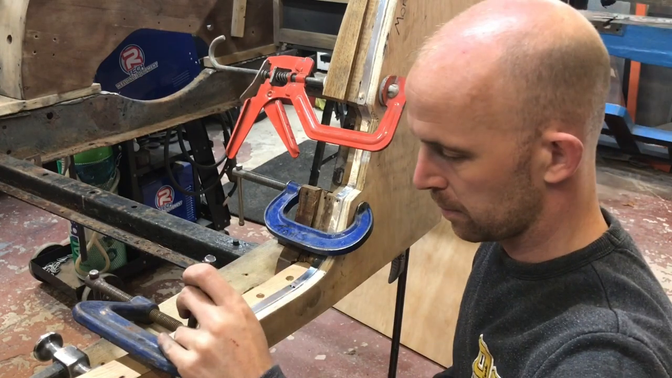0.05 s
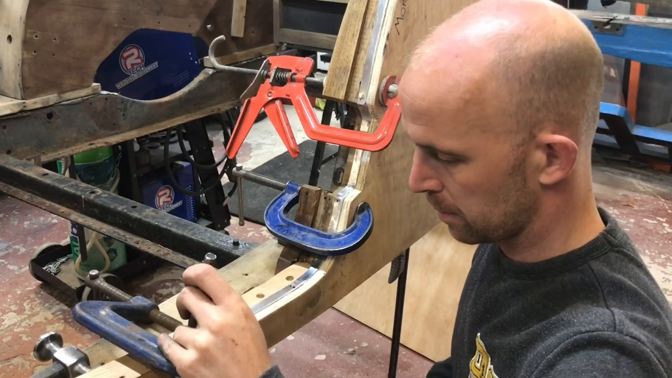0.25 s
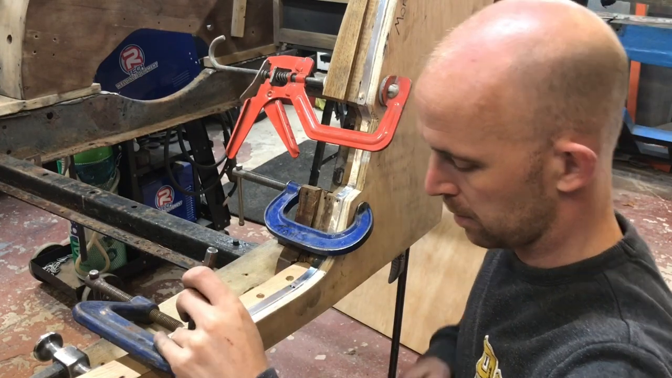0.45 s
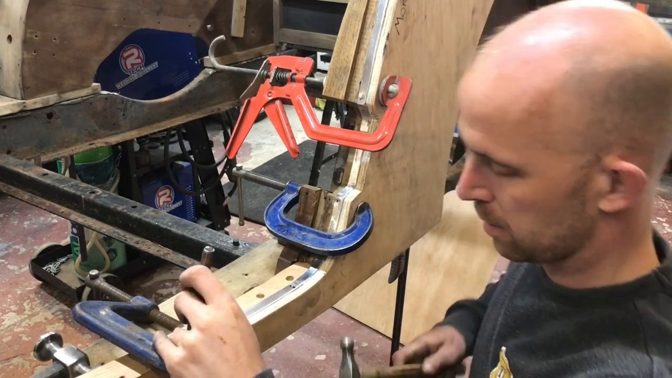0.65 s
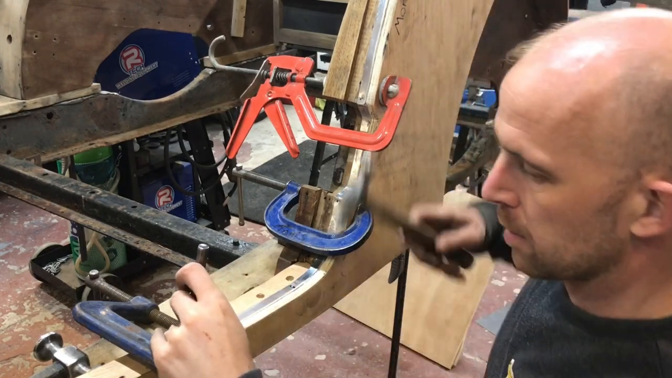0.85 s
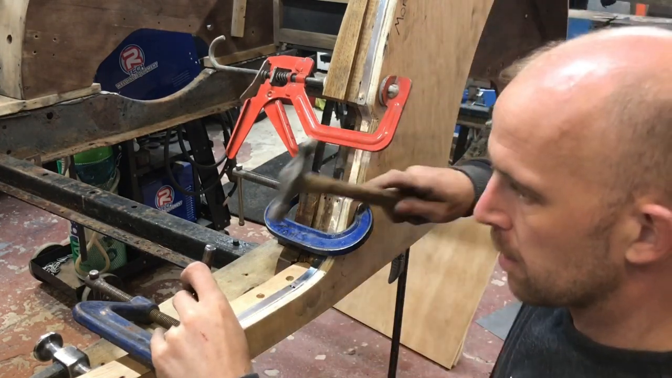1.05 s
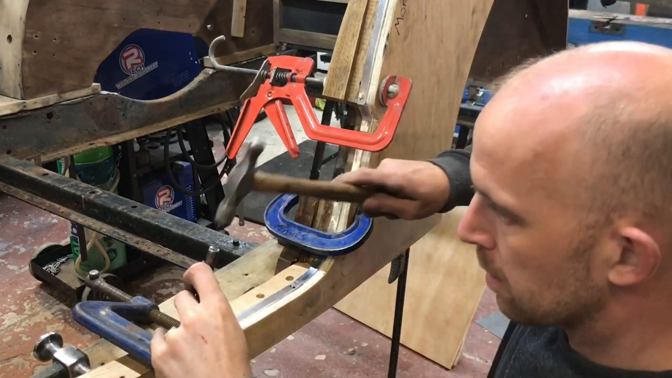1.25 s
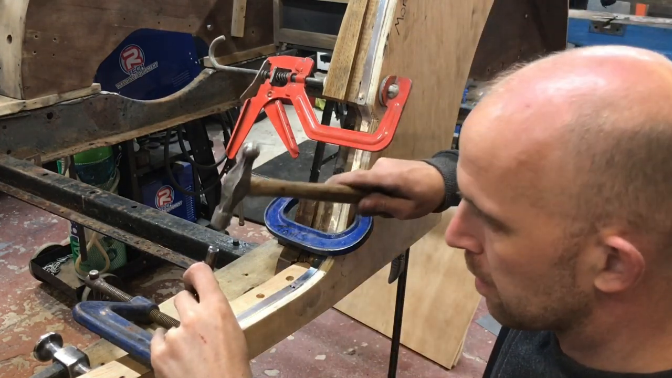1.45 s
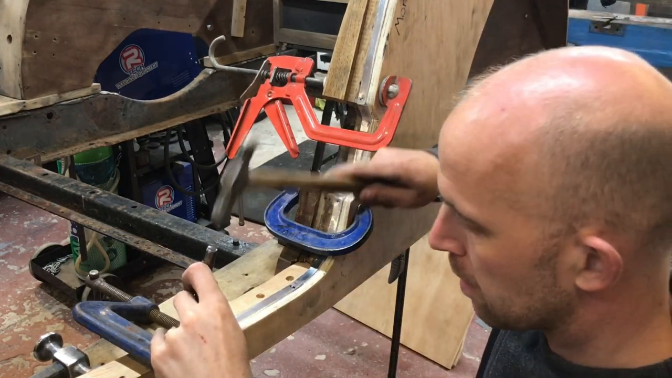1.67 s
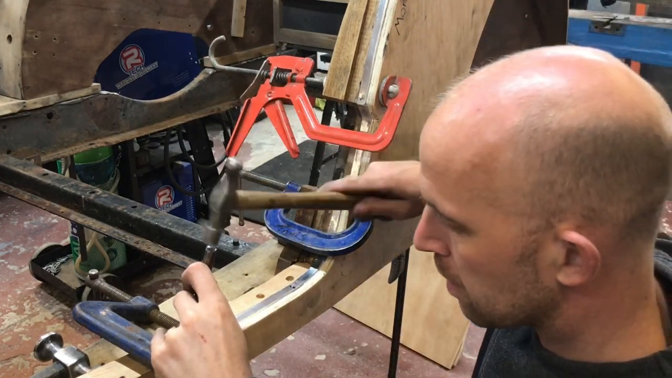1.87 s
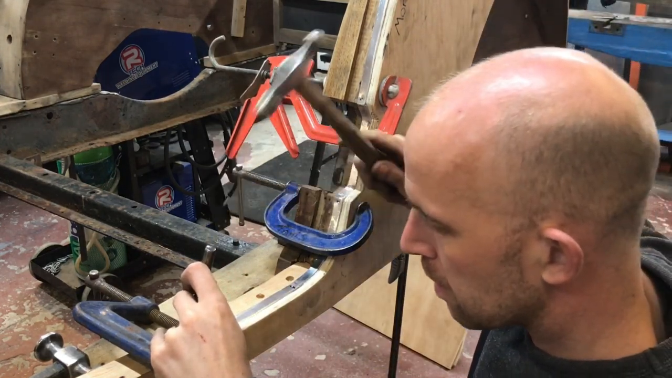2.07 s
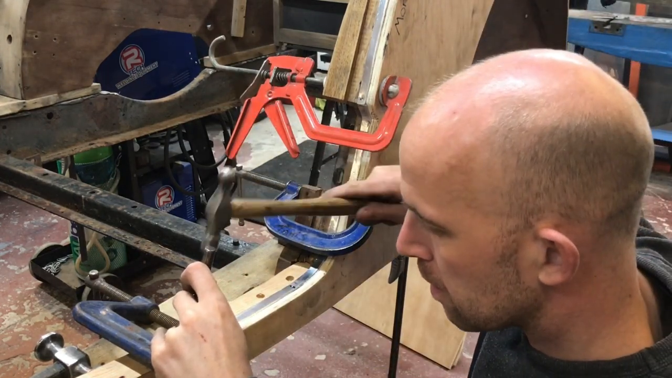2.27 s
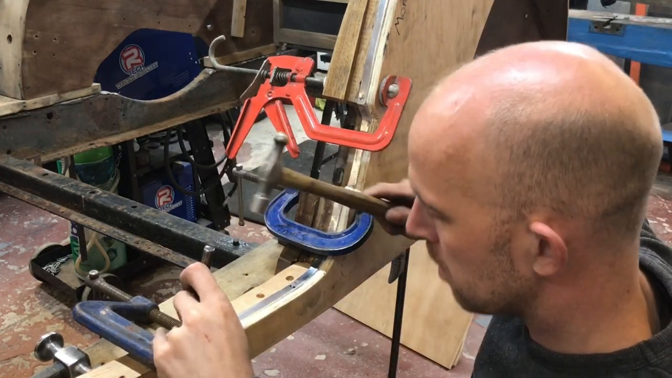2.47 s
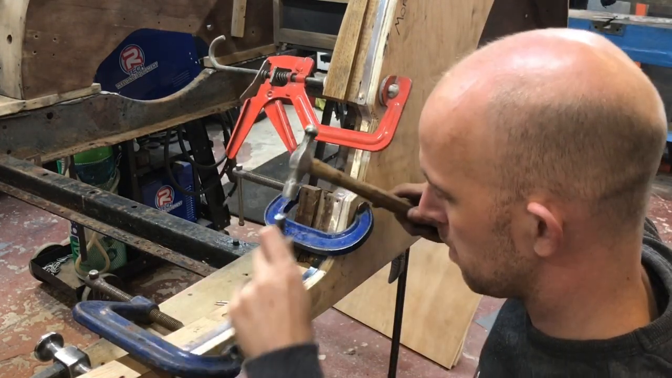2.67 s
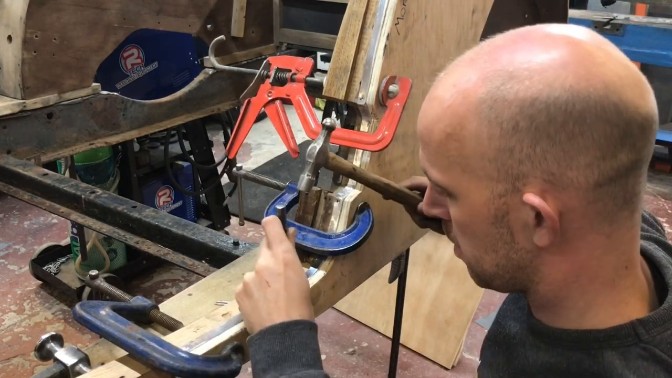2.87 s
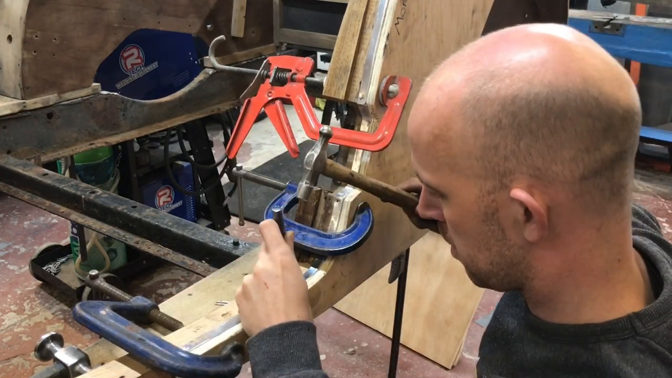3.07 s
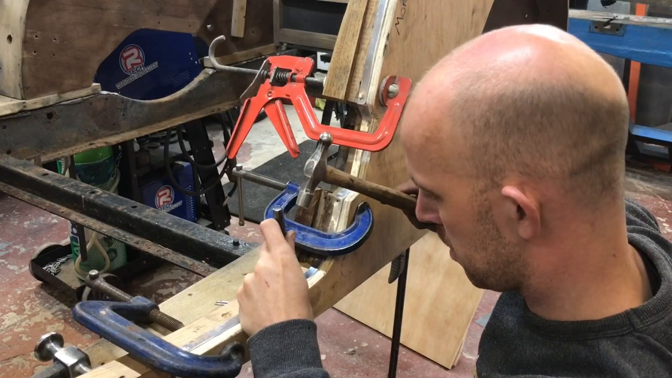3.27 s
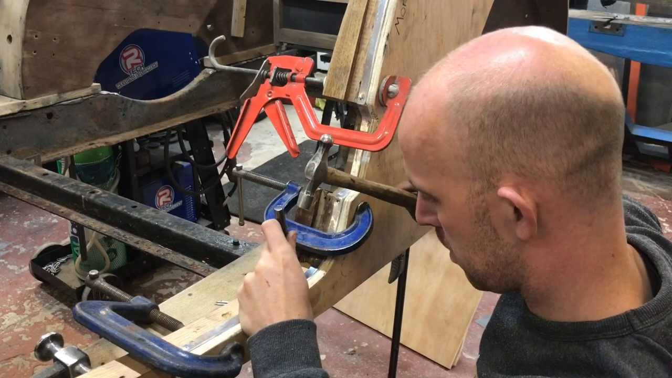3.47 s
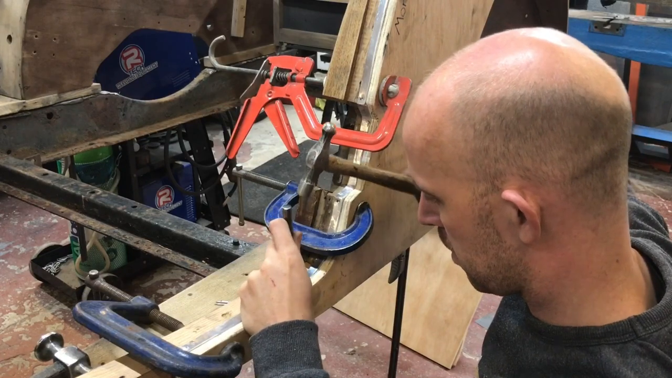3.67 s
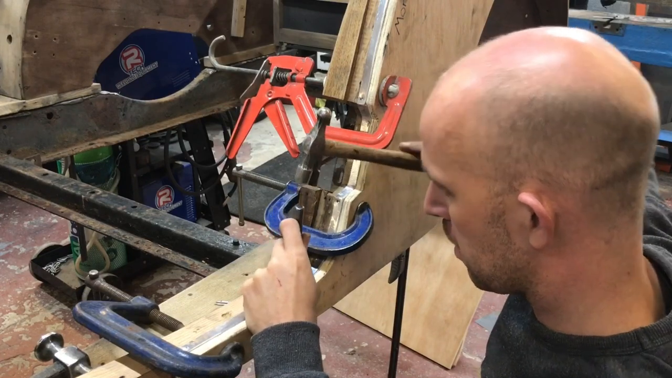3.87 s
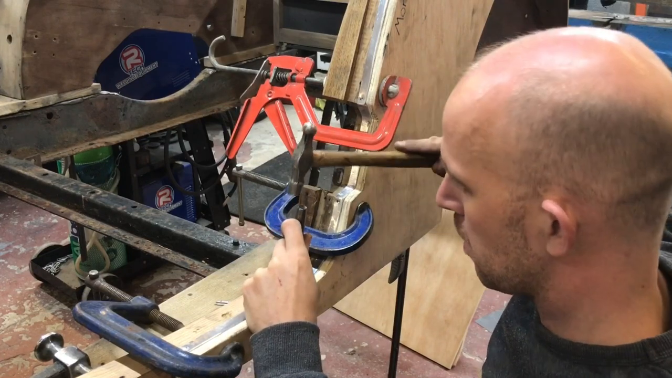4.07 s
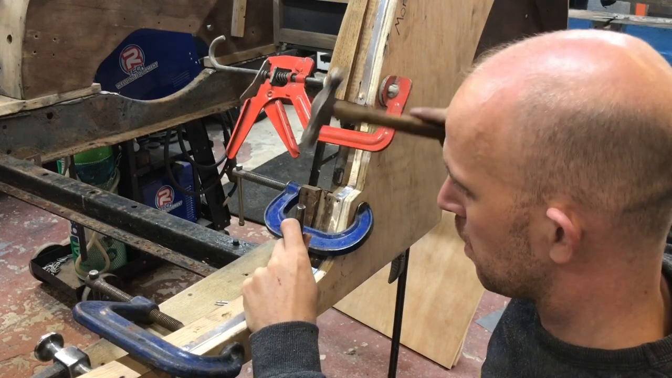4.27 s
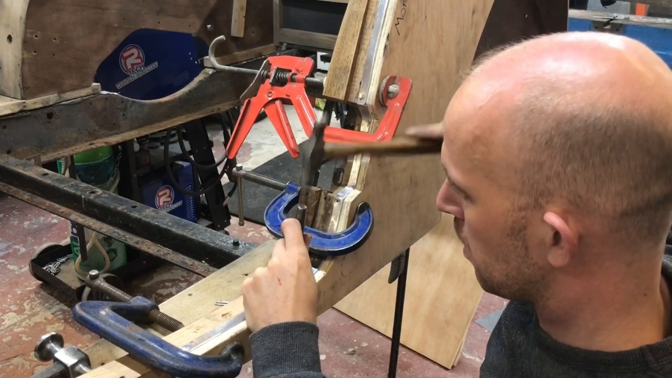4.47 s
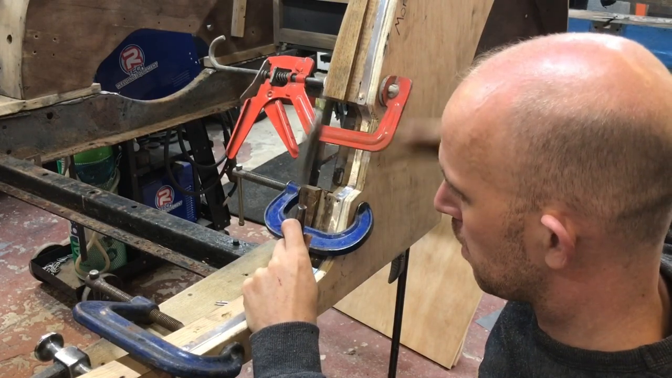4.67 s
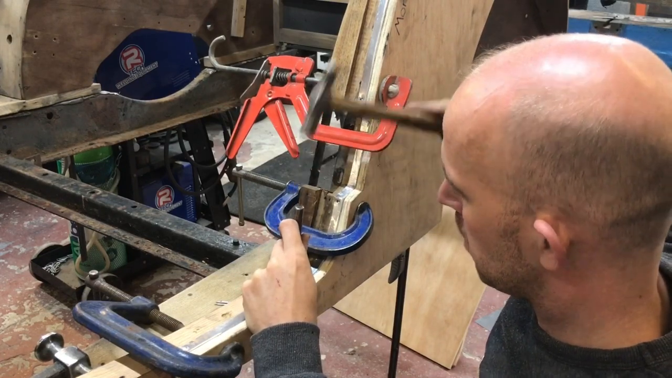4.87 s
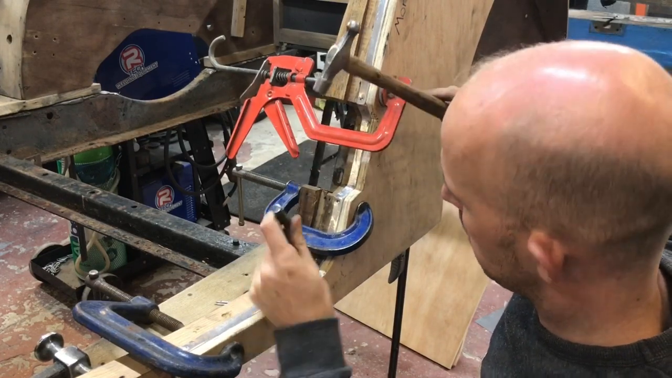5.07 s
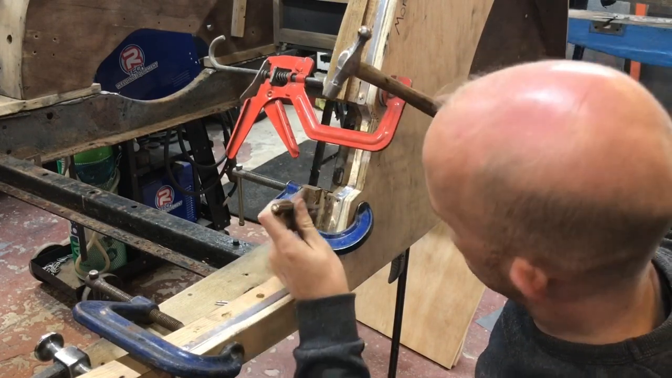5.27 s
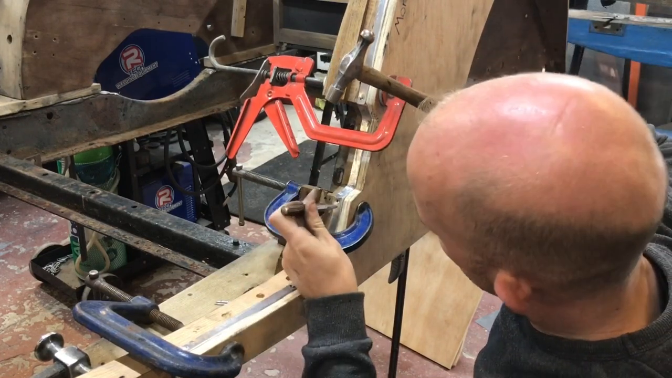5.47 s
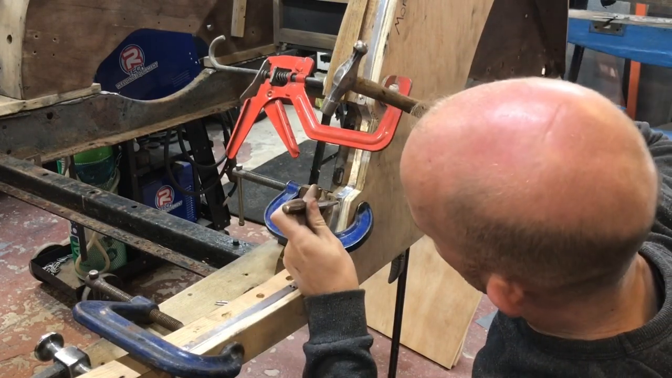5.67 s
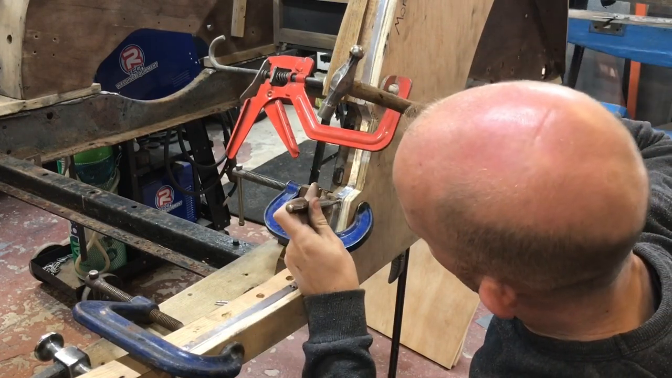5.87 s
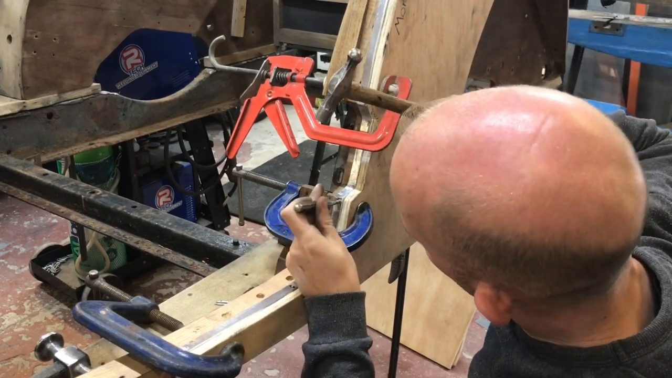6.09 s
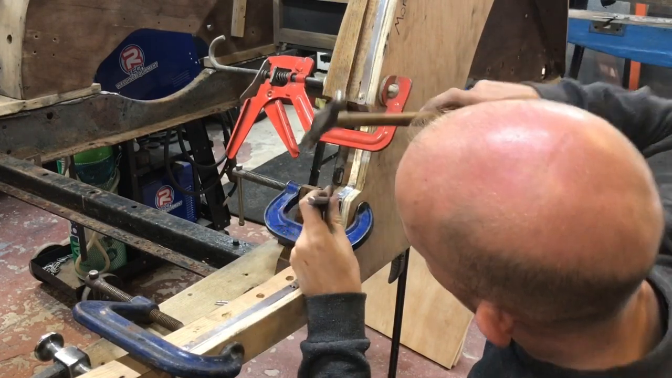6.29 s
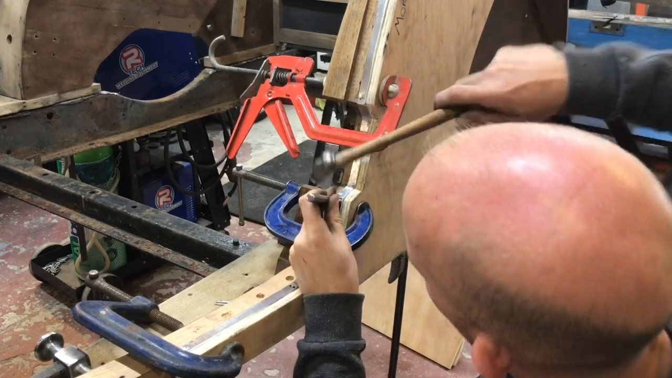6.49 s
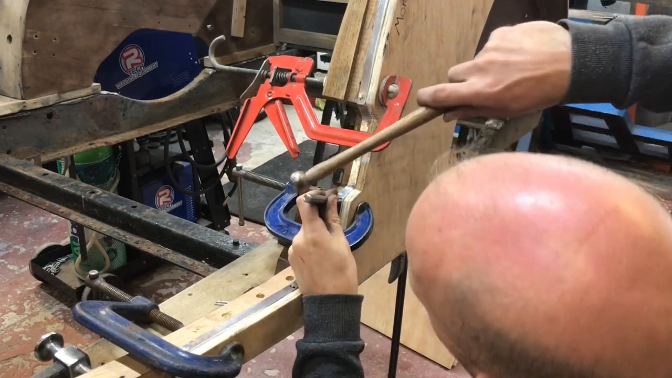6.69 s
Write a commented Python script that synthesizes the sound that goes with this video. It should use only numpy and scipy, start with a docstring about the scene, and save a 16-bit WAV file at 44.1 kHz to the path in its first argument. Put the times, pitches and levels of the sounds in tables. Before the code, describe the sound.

Five sharp, pinging hammer blows on a steel punch, in two groups, while workshop motors hum steadily in the background.

```python
"""Workshop motors hum from start to end, throbbing because their speeds differ slightly.
A sleeve rustles and a small hammer is picked up. It hits a centre punch three times, driving it
into a metal strip clamped on a wooden frame, then twice more at the next mark. Each blow cracks,
shakes strip and frame, sets the steel punch pinging and dies away in the room; on the first and
last, the hammer bounces once. A faint knock and one more rustle follow."""
import sys
import numpy as np
from scipy import signal
from scipy.fft import rfft, irfft, next_fast_len
from scipy.io import wavfile
from scipy.ndimage import uniform_filter1d

SR = 44100
rng = np.random.default_rng(int(sys.argv[2]) if len(sys.argv) > 2 else 0)


def to_wav(sig):
    """Store sig (one row per channel, or 1-D mono) as 16-bit WAV at the path in sys.argv[1].

    Samples outside -1..1 are clipped; the rate is SR.
    """
    pcm = np.clip(np.atleast_2d(sig), -1, 1) * 32767
    pcm = np.round(pcm).astype(np.int16)
    wavfile.write(sys.argv[1], SR, pcm.T)  # frames by channels


N = 296793
T = np.arange(N) / SR
AGE = np.arange(SR) / SR  # seconds since a hit


def gain(db):
    """Turn decibels into a number to multiply by."""
    return 10 ** (np.asarray(db) / 20)


def normalise(x):
    """Scale to an average strength (rms) of 1."""
    return x / np.sqrt(np.mean(x ** 2))


def frequencies(size):
    """The frequencies in a sound's spectrum, kept above zero."""
    size = next_fast_len(size)
    return np.maximum(np.arange(size // 2 + 1) * SR / size, 1)


def curve(hz, points):
    """Join (pitch_hz, value) points with lines, giving each octave equal room."""
    pitches, values = np.transpose(points)
    return np.interp(np.log(hz), np.log(pitches), values)


def above(hz, corner_hz):
    """A smooth step from 0 below the corner pitch to 1 above it."""
    return 1 / (1 + (corner_hz / hz) ** 4)


def tint(x, colour_db):
    """Turn each frequency up or down, then normalise."""
    size = next_fast_len(len(x))
    return normalise(irfft(rfft(x, size) * gain(colour_db), size)[:len(x)])


def noise(colour, size=N):
    """Noise shaped by a table of pitch_hz, relative_db."""
    return tint(rng.standard_normal(size), curve(frequencies(size), colour))


def noise_band(pitch_hz, width_hz, size=N):
    """Noise close to one pitch; at pitch 0 it is a random wobble."""
    distance = (frequencies(size) - pitch_hz) / width_hz
    return tint(rng.standard_normal(size), -20 * np.log10(1 + distance ** 2))


def fade(decay_s, rise_s=0):
    """Swell quickly, then fall by 60 dB every decay_s."""
    swell = 1 - np.exp(-(AGE / max(rise_s, 1 / SR)) ** 2)
    return swell * np.exp(-np.log(1000) * AGE / decay_s)


def die_away(x, bands, rise_s, cycles):
    """Let a steady sound swell and fade band by band; low bands swell more slowly."""
    spectrum, pitches = rfft(x), np.array(bands)[:, 0]
    tail = 0
    for share, (hz, decay_s, db) in zip(np.eye(len(bands)), bands):
        band = irfft(spectrum * curve(frequencies(SR), np.c_[pitches, share]), SR)
        tail += gain(db) * band * fade(decay_s, rise_s + cycles / hz)
    return tail


def bump(middle_s, half_length_s):
    """A smooth swell around one moment."""
    return np.exp(-.5 * ((T - middle_s) / half_length_s) ** 2)


def add(out, start_s, x):
    """Mix a sound in at start_s."""
    i = int(start_s * SR)
    out[i:i + len(x)] += x[:N - i]


# Two motors, their tones an octave up, and the mains hum: pitch_hz, level_db
MOTOR_TONES = [(46.68, -67), (48.58, -60), (93.37, -50), (97.19, -59.5), (99.97, -59)]
# Casings and fans droning along: pitch_hz, width_hz, level_db
CASING_DRONES = [(145, 5, -63), (186, 9, -64.5), (277, 8, -66), (323, 5, -68.5), (924, 5, -77),
                 (1331, 3, -83), (1557, 3, -83), (1580, 3, -86), (1701, 2, -82)]
# A soft rush of air: pitch_hz, relative_db
AIR_COLOUR = [(70, -28.5), (115, -12), (160, -12), (210, -16), (350, -21), (420, -26), (650, -26.5),
              (920, -25.5), (1600, -36), (2000, -39.5), (4000, -47.5), (8000, -56.5), (11000, -56.5),
              (15000, -58)]
# A deep rumble: pitch_hz, relative_db
RUMBLE_COLOUR = [(20, -48.5), (34, -24), (48, 0), (70, 2), (115, -4), (170, -13.5), (300, -39.5)]


def workshop(in_step_s=3.92, air_db=-57, rumble_db=-59):
    """Motors at slightly different speeds drift in and out of step, so their hum throbs."""
    phase_per_hz = 2 * np.pi * (T - in_step_s)
    hum = sum(gain(db) * np.sqrt(2) * np.cos(hz * phase_per_hz) for hz, db in MOTOR_TONES)
    drone = sum(gain(db) * noise_band(hz, width_hz) for hz, width_hz, db in CASING_DRONES)
    return hum + drone + gain(air_db) * noise(AIR_COLOUR) + gain(rumble_db) * noise(RUMBLE_COLOUR)


# Sleeve and handle sliding: middle_s, half_length_s, level_db
SLIDES = [(0.32, 0.033, -61.5), (0.443, 0.048, -54.5), (0.81, 0.057, -66), (6.18, 0.028, -77),
          (6.369, 0.11, -65.5)]
# The tone of that sliding: pitch_hz, relative_db
SLIDE_COLOUR = [(400, 7.5), (1800, -0.5), (3800, 2), (7000, -2), (10500, -4), (14000, 0), (16000, -5)]
# Small knocks from handling hammer and punch: start_s, level_db
KNOCKS = [(.396, -49), (0.4133, -37), (.426, -37), (.778, -53), (0.791, -50), (5.921, -64)]
# The tone of those knocks: pitch_hz, relative_db
KNOCK_COLOUR = [(500, 2), (2000, -19), (4300, 10), (7000, 0), (10000, 3), (13000, 1), (16000, -7)]


def handling(knock_decay_s=0.016, room_db=-20, grit_db=2, rub_hz=292):
    """Handling the tools makes light knocks, gritty rustles and one short, low rub."""
    knocks = np.zeros(N)
    echo = gain(room_db) * room_echo(noise(KNOCK_COLOUR, size=SR))
    for start_s, db in KNOCKS:
        knock = noise(KNOCK_COLOUR, size=SR) * fade(knock_decay_s)
        add(knocks, start_s, gain(db) * (knock + echo))
    cloth = noise(SLIDE_COLOUR) * gain(grit_db * noise_band(0, width_hz=120))
    sliding = sum(gain(db) * bump(middle_s, half_s) for middle_s, half_s, db in SLIDES)
    wobble = .4 * noise_band(0, width_hz=50)
    rub = gain(-44) * bump(.467, .018) * np.sin(2 * np.pi * rub_hz * T + wobble)
    shuffle = gain(-54.5) * bump(0.0085, 0.068) * noise_band(890, width_hz=700)
    return shuffle + sliding * cloth + knocks + rub


# How the workshop echoes: pitch_hz, decay_s, gain_db
ROOM_BANDS = [(119.7, 1, 1.5), (260, 1, -1.5), (700, 0.92, -3), (1771.5, 0.78, -1), (3080, 0.7, 1),
              (4760, 0.62, -3.5), (8450, 0.49, -1.5), (12786, 0.17, 5.5), (16000, .25, -3.5)]


def room_echo(x):
    """The room keeps a sound going: low pitches arrive late and stay longest."""
    return die_away(x, ROOM_BANDS, rise_s=0.014, cycles=3)


# The crack of steel on steel: pitch_hz, gain_db
CRACK_COLOUR = [(200, -32.5), (500, -13.5), (1000, -4.5), (1800, -5.5), (3300, 4), (7000, 2.5), (14000, 5)]
# How the shaking of strip and frame dies down: pitch_hz, decay_s, gain_db
SHAKE_BANDS = [(150, 0.25, 1), (392, 0.33, 0), (1000, 0.13, 5), (3000, .2, -0.5), (7000, 0.21, -3.5),
               (15000, 0.26, -2.5)]


def strike(body_db, grain, level_db, clank_hz, clank_db, treble_db, thud_db, room_db, crack_db):
    """Steel cracks on steel, the punch clanks, strip and frame shake, and the room answers."""
    hz = frequencies(SR)
    force_db = level_db + 10  # a usual blow is -10 dB
    treble_db += 0.64 * force_db  # harder blows are brighter
    crack_db -= 1.23 * force_db  # and have more body for their crack
    clank_shape = np.exp(-(np.log2(hz / clank_hz) / 0.38) ** 2)  # 0.38 octaves each way
    colour_db = body_db + clank_db * clank_shape
    colour_db += thud_db * (1 - above(hz, 550)) + treble_db * above(hz, 8000)
    crack = tint(rng.standard_normal(SR), colour_db + curve(hz, CRACK_COLOUR)) * fade(decay_s=0.011)
    shake = die_away(tint(grain[0], colour_db), SHAKE_BANDS, rise_s=0.0023, cycles=1.1)
    echo = room_echo(tint(grain[1], colour_db))
    return gain(crack_db) * crack + shake + gain(room_db) * echo


def resonances(depth_db=1.5):
    """A struck object favours some pitches over others: many tiny peaks and dips, in dB."""
    smooth = uniform_filter1d(rng.standard_normal(SR // 2 + 1), size=25)
    return depth_db * normalise(uniform_filter1d(smooth, size=25))


def ring(notes, rise_cycles=3):
    """A struck object rings at its own notes, a little differently each time."""
    out = 0
    for hz, db, decay_s in notes:
        tone = np.sqrt(2) * np.sin(2 * np.pi * (hz * AGE + rng.random()))
        out += gain(db) * fade(decay_s, rise_cycles / hz) * tone
    return out


def punch_ping(pitch_hz=8489, room_db=-15):
    """The punch rings along its length; fingers soon damp it, leaving a faint note and its echo."""
    bright = gain(7.5) * fade(decay_s=0.059, rise_s=0.0053)
    faint = gain(-16) * fade(decay_s=0.32)
    note = (bright + faint) * np.sqrt(2) * np.sin(2 * np.pi * pitch_hz * AGE)
    return note + gain(room_db) * room_echo(noise_band(pitch_hz, width_hz=60, size=SR))


# Hammer blows: start_s, level_db, clank_hz, head_ring_db, room_db
HAMMER_BLOWS = [(1.587, -12.5, 2620, -39.5, -7.5), (1.8781, -7, 3070, -35, -7.5),
                (2.1828, -7, 3220, -27, -6.5), (4.4158, -10, 3150, -31, -5), (4.7079, -8, 3280, -40, -5)]
# The hammer drops lightly back on the punch: start_s, level_db
BOUNCES = [(1.6205, -22.5), (4.7665, -24.5)]
# The tone at each of the two marks on the strip: clank_db, treble_db
MARK_TONES = [(8.6, -1.2), (10.5, 3)]
# The ping of the first blow on each mark: first_mark_db, second_mark_db
FIRST_PING_DB = [-5.5, -5]
# The broad tone of strip and frame: pitch_hz, first_mark_db, second_mark_db
BODY_COLOUR = [(141.93, -17, -17), (235, -3, -9), (408, -2.5, -4), (460, -7, -6.5), (680, 0, -5.5),
               (845, -3, -0.5), (1000, -2.5, -2), (1450, -5, -5.5), (1850, -11.5, -7.5), (3950, -11, -12),
               (4700, -12.5, -15), (6180, -10, -7), (7400, -18, -17.5), (10200, -15, -15),
               (13300, -17.5, -18.5), (14460, -22.5, -22.5)]
# Clear notes of strip and frame: pitch_hz, first_mark_db, second_mark_db, decay_s
FRAME_NOTES = [(183, -34, -30, .9), (231, -19, -26, .55), (274, -19, -30, .6), (328, -25, -31, .85),
               (415, -28, -25, .45), (627, -18.5, -25, .6), (682, -19.5, -24, .4), (820, -20, -16.5, .42),
               (883, -22, -17.5, .45), (948, -18.5, -19.5, .45), (1018, -16, -19, .32),
               (1037, -18, -28, .4), (1150, -22, -20, .4), (1290, -20, -22, .35), (1590, -25, -18.5, .42),
               (2277, -32, -21, .35), (2675, -20, -24, .3), (2858, -21, -26, .4), (2906, -26, -17.5, .4),
               (2951, -24, -18, .3), (3136, -19.5, -18, .42), (3268, -22, -16, .35), (3425, -24, -19, .3),
               (3604, -21, -26, .4), (4048, -30, -24, .4)]
# Notes of the hammer head: pitch_hz, relative_db, decay_s
HEAD_NOTES = [(7511, 0, .38), (7532, -4, .35), (10050, -3, .25), (14655, -6, .28)]


def hammering(next_mark_s=3.0, lowest_hz=125, alike=0.4, bounce_within_s=0.1):
    """Blows on one mark sound alike; the ping gets quieter as the punch sinks deeper."""
    out, hz, ping = np.zeros(N), frequencies(SR), punch_ping()
    for mark, (clank_db, treble_db) in enumerate(MARK_TONES):
        ripple_db = resonances() * above(hz, 1500)  # high notes crowd close together
        bass_cut_db = 10 * np.log10(above(hz, lowest_hz))
        body_db = curve(hz, np.array(BODY_COLOUR)[:, [0, 1 + mark]]) + ripple_db + bass_cut_db
        frame_notes = np.array(FRAME_NOTES)[:, [0, 1 + mark, -1]]
        shared_noise = rng.standard_normal((2, SR))

        def grain():
            """Noise for shake and echo: partly shared on this mark, partly new."""
            return np.sqrt(alike) * shared_noise + np.sqrt(1 - alike) * rng.standard_normal((2, SR))

        blows = [row for row in HAMMER_BLOWS if (row[0] > next_mark_s) == mark]
        for depth, (start_s, level_db, clank_hz, head_db, room_db) in enumerate(blows):
            ping_db = FIRST_PING_DB[mark] - 6.5 * depth ** 1.9
            tones = gain(-1) * ring(frame_notes) + gain(head_db) * ring(HEAD_NOTES)
            tones += gain(ping_db) * ping
            hit = strike(body_db, grain(), level_db, clank_hz, clank_db, treble_db,
                         thud_db=0.36, room_db=room_db, crack_db=5)
            add(out, start_s, gain(level_db) * (hit + tones))
            for bounce_s, bounce_db in BOUNCES:
                if 0 < bounce_s - start_s < bounce_within_s:
                    # a bounce has more clank, less thud and little echo
                    tap = strike(body_db, grain(), bounce_db, clank_hz=2950, clank_db=clank_db + 2,
                                 treble_db=treble_db, thud_db=-2.5, room_db=-18.5, crack_db=0.5)
                    add(out, bounce_s, gain(bounce_db) * (tap + tones))
    return out


def scene():
    """Everything at one close microphone."""
    return (hammering() + handling() + workshop())[None]


# Treble dips caused by the microphone's opening: pitch_hz, width_hz, gain_db
MICROPHONE_DIPS = [(4940, 140, -2), (7675, 350, -2.5), (10770, 600, -5)]


def record(dry, top_hz=15780):
    """The microphone colours the treble; the recorder rounds loud peaks and cuts the highest pitches."""
    size = next_fast_len(N)
    dips_db = sum(db * np.exp(-((frequencies(N) - hz) / width_hz) ** 2)
                  for hz, width_hz, db in MICROPHONE_DIPS)
    heard = irfft(rfft(dry, size) * gain(dips_db), size)[:, :N]
    rounded = heard / (1 + heard ** 6) ** (1 / 6)
    treble_cut = signal.ellip(10, .2, 80, top_hz, fs=SR, output="sos")
    return signal.sosfilt(treble_cut, rounded)


dry = scene()
out = record(dry)
to_wav(out)
```